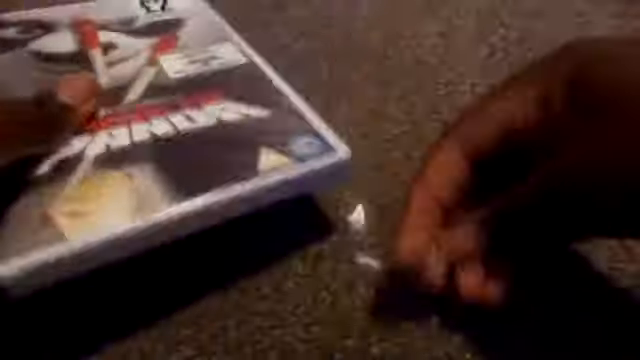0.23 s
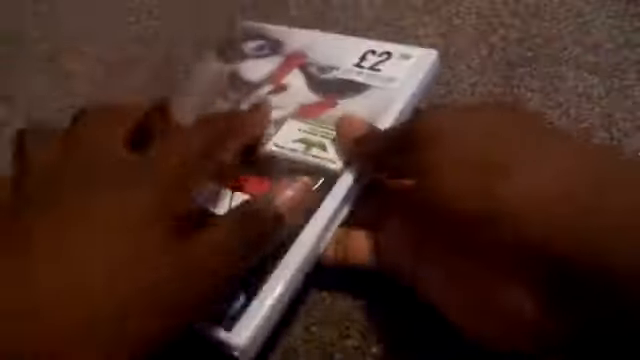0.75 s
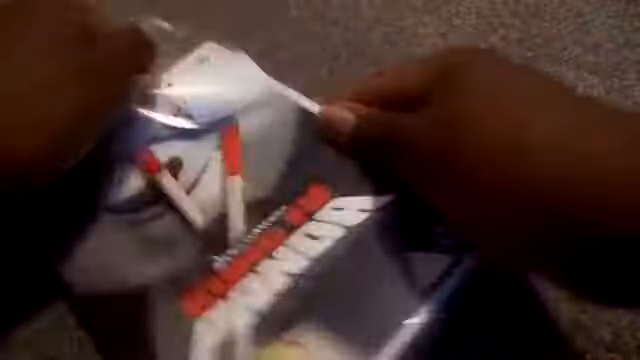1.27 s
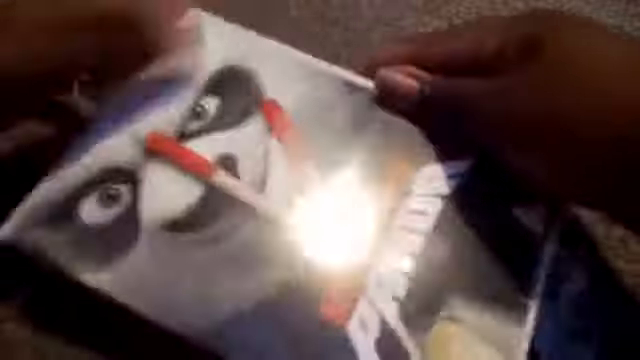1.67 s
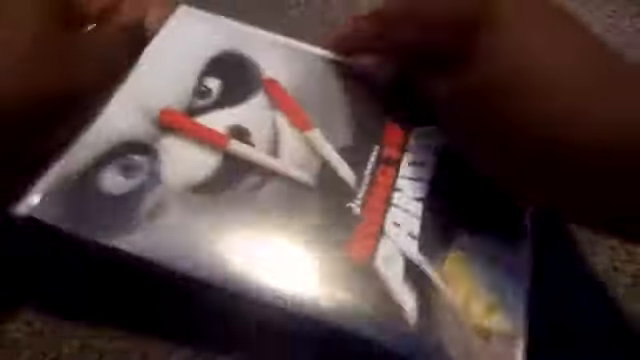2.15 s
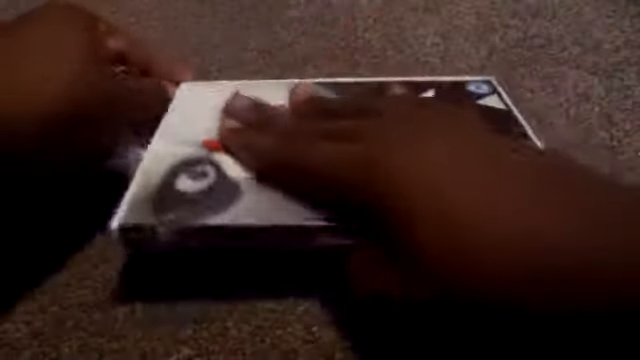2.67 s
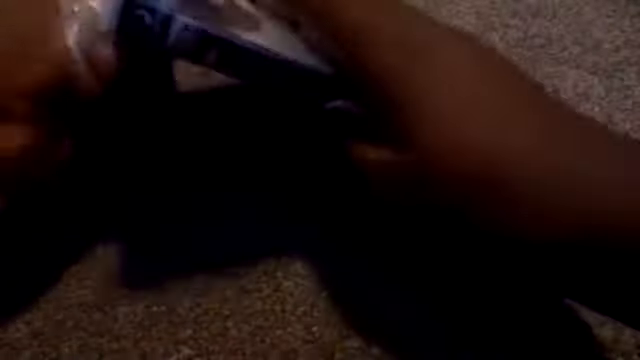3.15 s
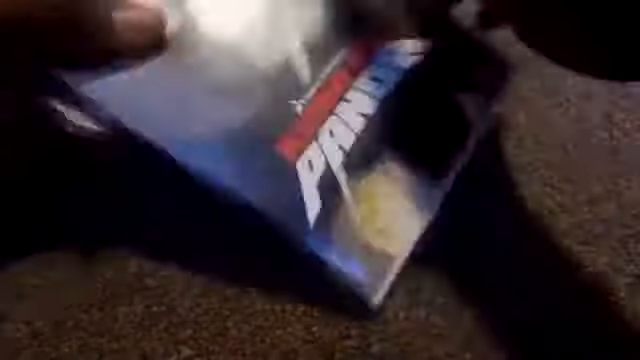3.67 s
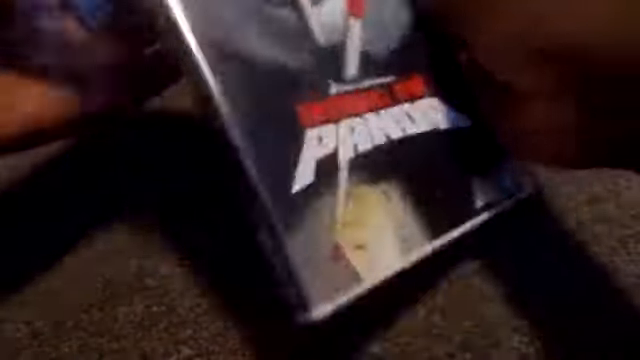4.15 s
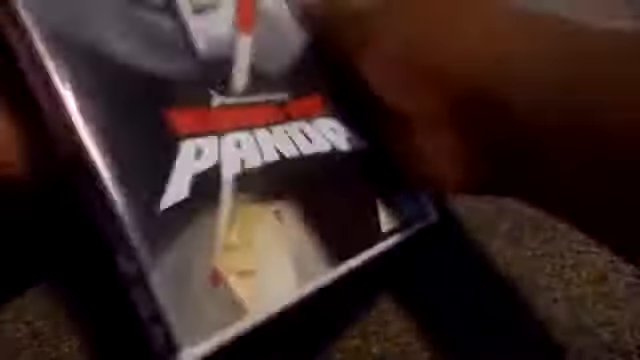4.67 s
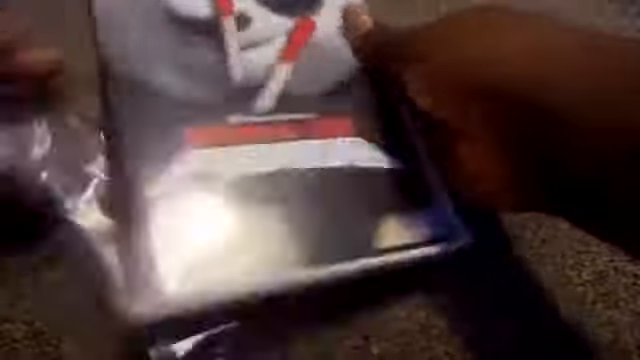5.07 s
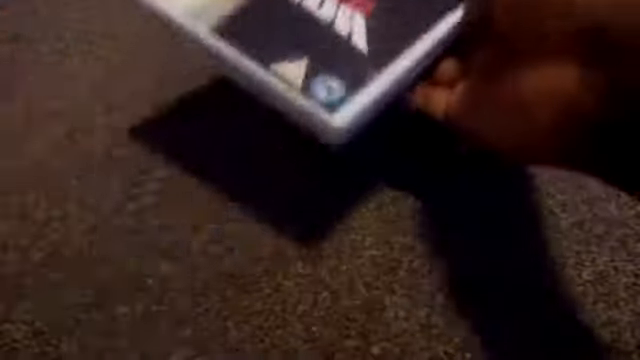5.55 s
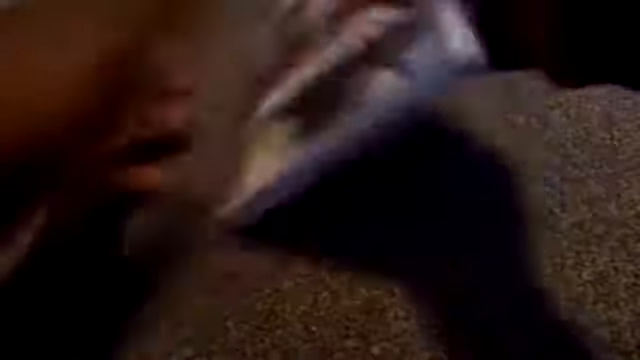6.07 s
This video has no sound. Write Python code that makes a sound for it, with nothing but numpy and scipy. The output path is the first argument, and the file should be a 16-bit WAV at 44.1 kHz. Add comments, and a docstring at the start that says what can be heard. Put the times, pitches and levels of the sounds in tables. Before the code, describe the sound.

A close, dry perspective in a quiet carpeted room with a faint low hush. From 0 to 1 s, light film ticks, small crinkles and soft knocks on a hollow plastic case, thinning to near quiet around 0.8 s. At 1.04 s a bright, sharp snap starts denser crackling; tugging strokes follow from 1.3 to 2.1 s, with dull case knocks, the strongest near 1.87 s. Crinkling continues with separate ticks at 2.44 and 2.68 s. At 2.87 s comes the loudest event, a hard dry crack with a brief rattle. Thick crumpling builds from 3.15 to 3.7 s, with a very brief dropout near 3.37 s. More crackling and a sharp tick come around 4.0 to 4.1 s, a knock at 4.38 s, and a rustle at 4.8 s. A rattly double clack with a low thump lands at 5.12 s. Crinkles fade by 5.7 s, leaving soft bumps and a small tick near 6.27 s.

```python
"""A quiet carpeted room: hands strip the thin plastic wrap off a disc case, heard close up.
The film crinkles, crumples and snaps: trains and bursts of coloured noise, each with its own ring.
The hollow case knocks under the fingers through its damped modes, cracks sharply once as the wrap
is dragged over it, and clacks as it pulls free. Short reflections, a faint tail and a hush surround it."""
import sys
import numpy as np
from scipy import signal
from scipy.fft import rfft, irfft, next_fast_len
from scipy.io import wavfile
from scipy.ndimage import uniform_filter1d

SR = 44100
rng = np.random.default_rng(int(sys.argv[2]) if len(sys.argv) > 2 else 0)


def output_pcm(signal):
    """Save a mono or channel-first signal as 16-bit PCM at the path in sys.argv[1].

    Samples are clipped to [-1, 1] before scaling.
    """
    pcm = np.clip(np.atleast_2d(signal).T, -1, 1) * 32767
    wavfile.write(sys.argv[1], SR, np.round(pcm).astype(np.int16))


N = 278535
TIME = np.arange(N) / SR


def amp(db):
    """Decibels to gain."""
    return 10 ** (np.asarray(db) / 20)


def unit(x):
    """Scales to an rms of 1."""
    return x / np.sqrt(np.mean(x ** 2) + 1e-20)


def read(points, hz):
    """Reads a table on a log-frequency axis."""
    f, value = np.transpose(points)
    return np.interp(np.log(hz + 1), np.log(f + 1), value)


def add(mix, start_s, sound):
    """Mixes a stereo sound in at start_s."""
    part = mix[:, round(start_s * SR):][:, :sound.shape[1]]
    part += sound[:, :part.shape[1]]


# stereo difference: [f/Hz, side re mid/dB at narrow = 1]
SIDE_LEVEL = [(100, -15), (1000, -9), (2500, -16), (5000, -7), (9000, -4.5), (15000, -2.5)]


def noise(colour, size, tilt_db=0, narrow=1, lumps_db=0):
    """Coloured stereo noise of rms 1 with chance resonances; tilt_db per octave, narrow scales side dB."""
    hz = np.fft.rfftfreq(size, 1 / SR)
    centres_hz = np.geomspace(150, 16000, num=34)
    lumps = read(np.column_stack([centres_hz, rng.standard_normal(len(centres_hz))]), hz)
    shape_db = read(colour, hz) + tilt_db * np.log2(hz + 1) + lumps_db * lumps
    mid, side = rfft(rng.standard_normal((2, size))) * amp(shape_db)
    side = side * amp(narrow * read(SIDE_LEVEL, hz))
    return unit(irfft([mid + side, mid - side], size))


def burst(colour, decay_s, size=4096, tilt_db=0, narrow=1, lumps_db=0):
    """A blow sets many close modes ringing, all dying fast: noise under a 0.1 ms attack and a decay."""
    t = np.arange(size) / SR
    shape = np.exp(-t / decay_s) * (1 - np.exp(-t / .0001))
    shape_rms = np.sqrt(np.mean(shape ** 2))
    return unit(noise(colour, size, tilt_db, narrow, lumps_db) * shape) * shape_rms


# spectrum of the hush: [f/Hz, relative density/dB]
HUSH_COLOUR = [(25, 2), (50, -5), (80, -6), (180, -12), (400, -17), (1000, -24), (2500, -28), (6000, -32),
               (10000, -36), (16000, -40)]


def hush(level_db=-62):
    """Steady room noise, strongest in the bass."""
    return amp(level_db) * noise(HUSH_COLOUR, size=next_fast_len(N), narrow=.6)[:, :N]


# decay of the tail: [f/Hz, t60/s]
ROOM_T60 = [(150, 1), (600, 0.53), (2500, 0.35), (8000, 0.72), (16000, 0.48)]


def room(x, near_db=-11, near_decay_s=0.0075, tail_db=-17):
    """Quick reflections off case and hands, then the faint tail of a carpeted room."""
    flat = [(20, 0), (20000, 0)]
    hz, t, z = signal.stft(noise(flat, size=16384), SR, nperseg=256)
    decay_db = -60 * t / read(ROOM_T60, hz)[:, None]
    tail = signal.istft(z * amp(decay_db), SR, nperseg=256)[1]
    near = burst(flat, near_decay_s, size=tail.shape[1])
    echo = amp(near_db) * near / np.linalg.norm(near[0])
    echo = echo + amp(tail_db) * tail / np.linalg.norm(tail[0])
    delayed = np.pad(echo, ((0, 0), (SR // 1000, 0)))  # 1 ms
    return signal.fftconvolve(x.mean(0)[None], delayed, axes=1)[:, :N]


# soft bumps of the hands on the case: [t/s, level/dB, f/Hz, time to envelope peak/s]
HAND_BUMPS = [(0.266, -44.5, 316, 0.0045), (4.193, -41, 206, 0.001), (4.383, -31, 297, 0.00067),
              (5.118, -27.5, 90, 0.0024), (5.120, -26.5, 350, 0.0028), (5.956, -38.5, 237, 0.0019),
              (6.255, -45.5, 276, 0.0028), (6.269, -32.5, 210, 0.00084)]


def bumps(size=6000):
    """Soft pads push the case: a few low cycles, equal in both channels."""
    out, t = np.zeros((2, N)), np.arange(size) / SR
    for start_s, db, hz, peak_s in HAND_BUMPS:
        envelope = t / peak_s * np.exp(1 - t / peak_s)
        push = amp(db) * envelope * np.sin(2 * np.pi * hz * t)
        add(out, start_s, np.array([push, push]))
    return out


# free ringing of the shell: [f/Hz, relative level/dB, t60/s]
SHELL_MODES = [(360, -23, 0.12), (550, 1, 0.027), (768, -3.5, 0.022), (895, -5, 0.024), (1184, -1.5, 0.036),
               (1354, -3, 0.026), (1750, -7, 0.11), (2236, -6.5, 0.1), (2310, -56, .08), (2750, 0, 0.067),
               (4140, -19, .09), (5100, -6, 0.054)]


def shell_ring(size):
    """Modes of the shell as decaying sines, one a row, with their frequencies."""
    hz, db, t60_s = np.transpose(SHELL_MODES)[:, :, None]
    t = np.arange(size) / SR
    return hz, amp(db - 60 * t / t60_s) * np.sin(2 * np.pi * hz * t)


# spectrum of the case body: [f/Hz, relative density/dB]
CASE_COLOUR = [(60, -2.5), (150, -2.5), (330, -2), (500, 1), (800, -3), (1200, 0.5), (1800, -6),
               (3000, -12), (6000, -11), (16000, -17)]
# fingers and edges on the case: [t/s, level/dB before trim, centre f/Hz, decay/s]
# decay: power of the ring's damping, amplitude of the scuff
CASE_KNOCKS = [(0.128, -31.5, 1600, 0.0055), (0.267, -43, 1380, 0.0033), (.458, -41.5, 1000, 0.0083),
               (0.75, -34.5, 1240, .004), (0.937, -32, 1070, 0.0032), (1.325, -33.5, 875, 0.0075),
               (1.485, -28.5, 1250, 0.0072), (1.545, -31, 990, 0.0036), (1.863, -22.5, 1240, 0.0016),
               (1.878, -28.5, 910, 0.011), (2.28, -40, 497, 0.011), (2.382, -30, 1160, 0.0094),
               (2.758, -42, 1000, 0.0038), (3.217, -32, 775, 0.0076), (3.392, -29, 1110, 0.0091),
               (3.969, -44, 900, 0.012), (4.195, -51, 700, 0.0073), (4.383, -23.5, 930, 0.0029),
               (4.778, -36.5, 630, 0.027), (5.287, -33, 1260, 0.0065), (5.373, -35.5, 1000, 0.0055),
               (5.9868, -41.5, 930, 0.003)]


def knocks(trim_db=-1, spread_octaves=0.6, scuff_db=-10, contact_s=0.00028, size=6000):
    """Each tap wakes the modes near its own pitch, which the grip soon damps, and scuffs the case."""
    out, t = np.zeros((2, N)), np.arange(size) / SR
    mode_hz, modes = shell_ring(size)
    for start_s, db, hz, decay_s in CASE_KNOCKS:
        share = np.exp(-np.square(np.log2(mode_hz / hz) / spread_octaves) / 2)
        contact = 1 - np.exp(-np.square(t / contact_s))
        damping = np.exp(-t / (2 * decay_s))
        ring = contact * damping * (share * modes).sum(0) / np.linalg.norm(share)
        scuff = amp(scuff_db) * burst(CASE_COLOUR, decay_s, size=size)
        add(out, start_s, amp(db + trim_db) * (2 * ring + scuff))
    return out


# spectrum of the cracking shell: [f/Hz, relative density/dB]
SHELL_COLOUR = [(80, -56), (400, -64), (800, -9), (1500, -4.5), (2300, 0), (3500, -3), (5500, -7),
                (8000, -11.5), (16000, -11.5)]
# cracks of the shell: [t/s, level/dB before trim, tick decay/s, rattle re tick/dB, rattle decay/s,
# tilt/(dB/octave), case body re tick/dB, factor on side dB]
SHELL_CRACKS = [(2.8725, -7.5, 0.0013, -13.5, 0.011, -1.5, -32.5, 0.4),
                (5.115, -23, 0.0009, 1.5, 0.014, 2.5, -5.5, 3.6),
                (5.1191, -13.5, 0.0012, -7.5, 0.02, 4.5, -13, 2.7)]


def cracks(trim_db=2, ring_db=-27, body_decay_s=0.014, size=8192):
    """The shell snaps over, rattles against itself, thumps and rings in its modes."""
    out = np.zeros((2, N))
    ring = amp(ring_db) * shell_ring(size)[1].sum(0)
    for start_s, db, decay_s, rattle_db, rattle_decay_s, tilt_db, body_db, narrow in SHELL_CRACKS:
        tick = burst(SHELL_COLOUR, decay_s, size, tilt_db, narrow)
        rattle = amp(rattle_db) * burst(SHELL_COLOUR, rattle_decay_s, size, tilt_db, narrow)
        thump = amp(body_db) * burst(CASE_COLOUR, body_decay_s, size, narrow=narrow)
        add(out, start_s, amp(db + trim_db) * (tick + rattle + thump + ring))
    return out


# spectrum of the film: [f/Hz, relative density/dB]
FILM_COLOUR = [(200, -34), (1000, -26), (2000, -2.5), (3200, 0), (5000, 0), (7000, 0.5), (10000, -0.5),
               (13000, -3.5), (16000, -2)]
# single buckles of the film: [t/s, level/dB before trim, decay/s, tilt/(dB/octave)]
FILM_SNAPS = [(0.079, -33.5, 0.0048, 3), (0.132, -28, 0.0066, 25), (.181, -29.5, 0.0025, 1.5),
              (.19, -33, 0.0008, 3), (.219, -32, 0.0038, 6), (.226, -24, 0.0011, 7), (.236, -25, .0009, 2),
              (.4235, -27, .001, 10), (.666, -36.5, 0.0017, -11), (.742, -39.5, 0.0021, -5),
              (.921, -32.5, 0.0036, 18), (1.038, -30, 0.0051, -3.5), (1.0412, -12, 0.0056, 15),
              (1.1585, -21.5, 0.0013, 12), (1.168, -29, 0.0062, 3.5), (1.2217, -27.5, 0.0019, 4.5),
              (1.239, -29, .0035, 4), (1.282, -23, 0.0017, 1.5), (1.312, -34.5, 0.013, 4),
              (1.451, -36, 0.0033, -4), (1.487, -23.5, 0.0024, 2), (1.789, -33.5, 0.0017, -5.5),
              (1.939, -26, .001, 5), (2.4423, -21, 0.0021, 7), (2.454, -28.5, 0.0039, 0),
              (2.6165, -35, 0.0021, 7), (2.6822, -27, 0.0028, 9), (2.809, -27, 0.0044, 2.5),
              (2.955, -33, .003, 9), (3.0246, -29, 0.0014, 5.5), (3.16, -25.5, 0.0051, -2.5),
              (3.294, -20, 0.0043, 2), (3.494, -32, 0.0027, -1.5), (3.58, -37.5, 0.0021, -2),
              (3.832, -39, 0.0038, 0), (4.075, -26, 0.0024, 5), (4.1126, -18, 0.00098, -0.5),
              (4.281, -33, 0.006, 4), (4.304, -27.5, 0.0028, 4.5), (4.891, -28.5, 0.0017, 1.5),
              (5.209, -32.5, 0.00082, 2.5), (6.276, -29.5, 0.0013, -4)]


def snaps(trim_db=2, body_decay_s=0.0022, body_db=-14, body_db_per_tilt=-0.91):
    """A large buckle ticks with a ring of its own; the brighter it tilts, the less it shakes the case."""
    out = np.zeros((2, N))
    for start_s, db, decay_s, tilt_db in FILM_SNAPS:
        tick = burst(FILM_COLOUR, decay_s, tilt_db=tilt_db, lumps_db=5.5)
        body_gain = amp(body_db + body_db_per_tilt * max(tilt_db, 0))
        body = body_gain * burst(CASE_COLOUR, body_decay_s)
        add(out, start_s, amp(db + trim_db) * (tick + body))
    return out


# collapsing folds: [peak t/s, level/dB, rise/s, fall/s, case body re film/dB, fold ring f/Hz]
FOLD_CRUMPLES = [(0.265, -44.5, .005, 0.018, 6, 1580), (1.051, -36, 0.0086, 0.0051, -8, 2880),
                 (1.383, -33, 0.013, 0.0076, -11.5, 4000), (1.58, -27.5, 0.011, 0.012, 0.5, 2480),
                 (2.857, -29, 0.011, 0.045, -9.5, 4450), (3.295, -27, 0.023, 0.011, -5, 5860),
                 (3.344, -32.5, 0.008, .005, -1.5, 4530), (3.411, -34.5, 0.031, 0.039, -10.5, 7000),
                 (3.688, -38, 0.0093, 0.0094, 5.5, 5230), (4.022, -27, 0.0091, 0.035, -10.5, 5460),
                 (5.15, -25, .007, .011, -9.5, 7550), (5.41, -38.5, 0.039, 0.034, -23, 4860),
                 (6.278, -39.5, 0.011, 0.0097, -16, 2360)]


def crumples(skirt_db=-8, buckles_per_s=2200, buckle_decay_s=.0008, size=16384):
    """A fold gives way: dense crackles swell and die around its own resonance, and shake the case."""
    out, t = np.zeros((2, N)), (np.arange(size) - size / 2) / SR
    for peak_s, db, rise_s, fall_s, body_db, hz in FOLD_CRUMPLES:
        # upper slope starts from 0.87 hz: level steps down just above the ring
        fold = [(hz / 10, 3 * skirt_db), (hz / 1.07, skirt_db), (hz, 0),
                (hz * 0.87, 0.29 * skirt_db), (hz * 5, 2 * skirt_db)]
        sizes = amp(3.5 * rng.standard_normal(size))
        buckles = (rng.random(size) < buckles_per_s / SR) * sizes
        grains = unit(signal.lfilter([1], [1, -np.exp(-1 / (buckle_decay_s * SR))], buckles))
        surge = amp(db) * np.exp(-np.abs(t) / np.where(t < 0, rise_s, fall_s))
        film = grains * noise(fold, size, lumps_db=3)
        body = amp(body_db) * noise(CASE_COLOUR, size, lumps_db=3)
        add(out, peak_s + t[0], surge * (film + body))
    return out


def flex(x, depth_db):
    """As the plastic bends, its resonances come and go in patches of about 500 Hz and 35 ms."""
    z = signal.stft(x, SR, nperseg=512)[2]
    patches = uniform_filter1d(rng.standard_normal(z.shape[1:]), size=6, axis=0)
    patches = unit(uniform_filter1d(patches, size=6, axis=1))
    return signal.istft(z * amp(depth_db * patches), SR, nperseg=512)[1][:, :N]


def crackle(colour, per_s, spread_db, decay_s, variety_db, creases=20):
    """Tiny buckles of uneven size; each crease has its own ring and is active in spells."""
    out = np.zeros((2, N))
    knots_s = np.linspace(0, N / SR, num=280)
    for _ in range(creases):
        ring = burst(colour, decay_s, size=1024, tilt_db=variety_db * rng.standard_normal())
        spell = np.interp(TIME, knots_s, rng.standard_normal(len(knots_s)))
        at = np.flatnonzero(rng.random(N) < per_s / creases / SR)
        sizes_db = spread_db * np.minimum(rng.standard_exponential(N)[at], 4) + 1.56 * spell[at]
        clicks = np.zeros(N)
        clicks[at] = amp(sizes_db) * (-1) ** at  # either polarity
        out += signal.oaconvolve(clicks[None], ring, axes=1)[:, :N]
    out = flex(out, depth_db=3)
    power = uniform_filter1d((out ** 2).mean(0), size=1800)
    return out / np.sqrt(np.abs(power) + 1e-9)  # evens the level over 41 ms


def swell(t, peak_s, length_s, rise_share=.48, roundness=2.05):
    """Power of a stroke building to its peak and letting go; roundness 1 = pointed, 2 = bell."""
    width_s = length_s * np.where(t < peak_s, rise_share, 1 - rise_share)
    return np.exp(-np.minimum(np.abs(t - peak_s) / width_s, 10) ** roundness)


# hands holding the wrap between strokes: [t/s, crinkling level/dB before trim and wander]
HAND_GRIP = [(0.0, -49), (0.21, -52.5), (0.44, -60), (1.07, -59.5), (1.25, -50), (1.48, -55), (2.13, -53.5),
             (2.41, -47.5), (2.73, -53), (3.32, -41), (3.75, -50), (4.1, -48), (4.96, -54), (5.36, -67),
             (5.73, -74.5), (6.32, -71.5)]
# tugs and slides of the fingers: [peak t/s, level/dB, length/s, case rubbing re film/dB before trim]
FINGER_STROKES = [(0.134, -50.5, 0.028, 4), (0.243, -46, 0.03, -5), (0.333, -47, 0.025, -12),
                  (0.418, -45.5, 0.028, -9.5), (0.614, -56.5, 0.031, 9), (0.66, -54.5, 0.038, 7),
                  (0.772, -68, 0.1, 13), (1.081, -37.5, 0.028, -9.5), (1.254, -50.5, 0.044, -2),
                  (1.338, -40, 0.042, -9), (1.396, -35.5, 0.068, -9.5), (1.464, -33.5, 0.039, -25),
                  (1.559, -35.5, 0.072, -6), (1.653, -35, 0.036, -15), (1.733, -37.5, 0.049, -9),
                  (1.811, -47.5, 0.041, 6), (1.878, -41, 0.041, 1), (1.935, -40, 0.057, -9),
                  (2.016, -39, 0.038, -11.5), (2.238, -41, 0.061, -10.5), (2.523, -37, 0.055, -15.5),
                  (2.97, -43.5, 0.054, -18), (3.157, -38, 0.032, -15), (3.208, -41.5, 0.048, 0),
                  (3.347, -33.5, .05, -14), (3.427, -35.5, 0.074, -6), (3.514, -35, 0.042, -5),
                  (3.674, -37, 0.062, -10), (3.981, -35.5, 0.066, -6.5), (4.06, -35.5, 0.032, -7),
                  (4.196, -42, 0.016, 2.5), (4.385, -41, 0.036, -0.5), (4.514, -43.5, 0.044, -3),
                  (4.658, -50.5, .06, -7), (4.801, -38.5, 0.068, -10), (5.02, -42.5, 0.02, -4.5),
                  (5.057, -44.5, 0.028, -8), (5.275, -36, 0.039, -9.5), (5.39, -43.5, 0.2, -11),
                  (5.56, -46, 0.062, -2.5), (5.646, -54, 0.057, -2.5), (5.836, -60.5, 0.064, -17.5)]


def wrap(wander_db=1, grip_trim_db=.5, rub_trim_db=1, rub_db=-55, rub_at_grip_db=-55.5, rub_follow=0.37):
    """The film crackles under the grip and more with each stroke; the case beneath adds a dull rustle."""
    t = TIME[::32]
    grip_db = np.interp(t, *np.transpose(HAND_GRIP))
    wander = unit(uniform_filter1d(rng.standard_normal(len(t)), size=60))
    grip_db = grip_db + wander_db * wander  # the hands are never quite still
    film_power = amp(grip_db + grip_trim_db) ** 2
    case_power = amp(rub_db + rub_follow * (grip_db - rub_at_grip_db)) ** 2
    for peak_s, db, length_s, stroke_rub_db in FINGER_STROKES:
        power = amp(db) ** 2 * swell(t, peak_s, length_s)
        film_power = film_power + power
        case_power = case_power + power * amp(stroke_rub_db + rub_trim_db) ** 2
    bright = crackle(FILM_COLOUR, per_s=2300, spread_db=4.3, decay_s=.0009, variety_db=2.1)
    dull = crackle(CASE_COLOUR, per_s=900, spread_db=1.0, decay_s=0.0019, variety_db=0.95)
    film = np.interp(TIME, t, np.sqrt(film_power)) * bright
    rustle = np.interp(TIME, t, np.sqrt(case_power)) * dull
    return film + rustle


def scene():
    """Wrap and case in a quiet room."""
    close = bumps() + knocks() + cracks() + snaps() + crumples() + wrap()
    return hush() + room(close) + close


def record(dry, dip_s=3.368, dip_half_width_s=0.012, dip_db=-19, edge_hz=16000):
    """The level dips briefly once; then a low-pass limits the band."""
    dip = np.exp(-((TIME - dip_s) / dip_half_width_s) ** 4)
    dipped = dry * amp(dip_db * dip)
    low_pass = signal.firwin(511, edge_hz, window=("kaiser", 9), fs=SR)
    return signal.oaconvolve(dipped, low_pass[None], "same")


dry = scene()
out = record(dry)
output_pcm(out)
```